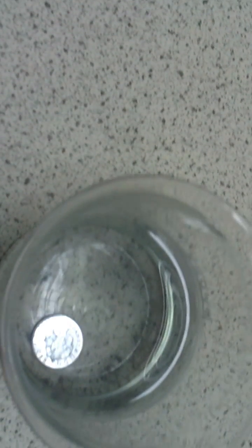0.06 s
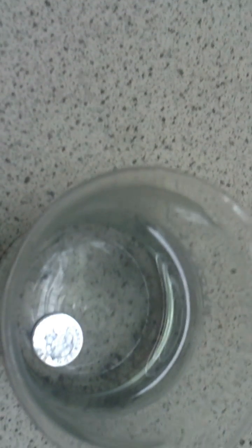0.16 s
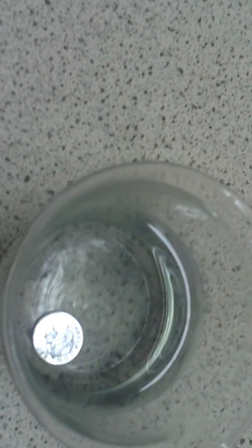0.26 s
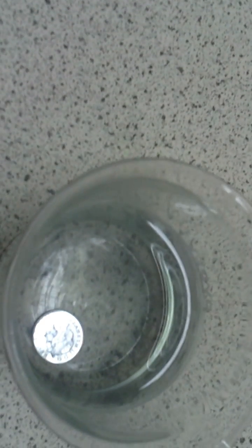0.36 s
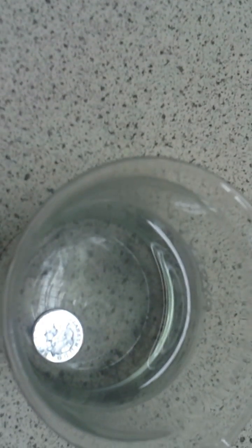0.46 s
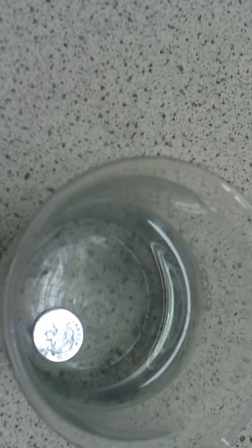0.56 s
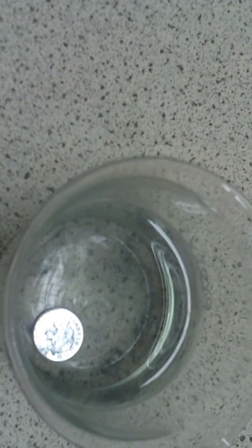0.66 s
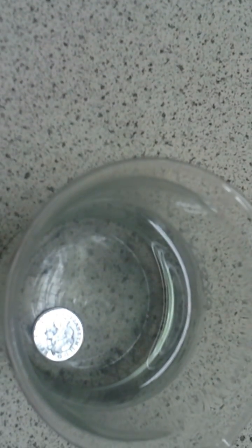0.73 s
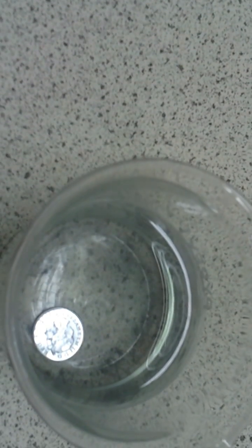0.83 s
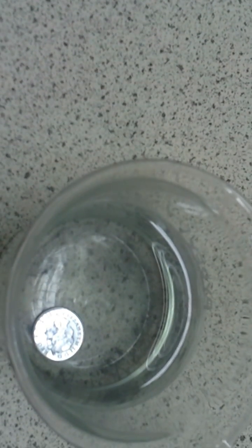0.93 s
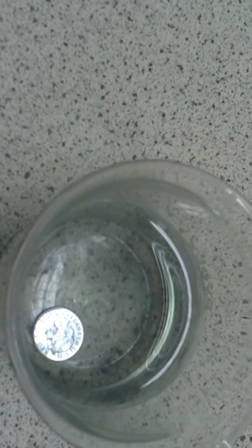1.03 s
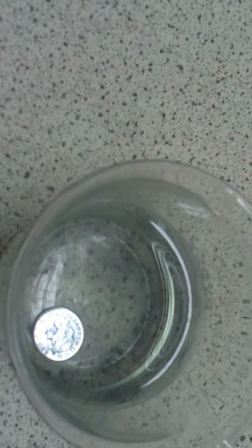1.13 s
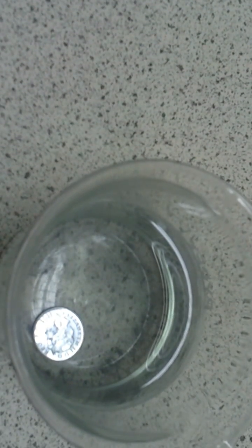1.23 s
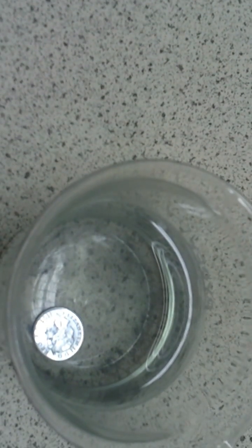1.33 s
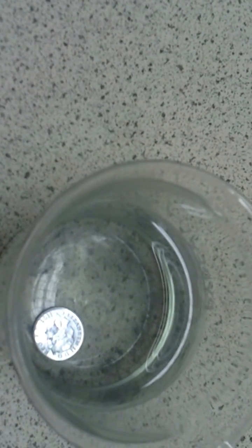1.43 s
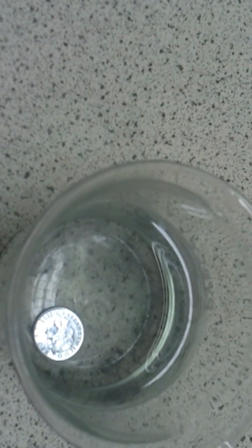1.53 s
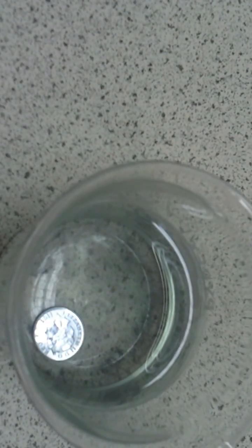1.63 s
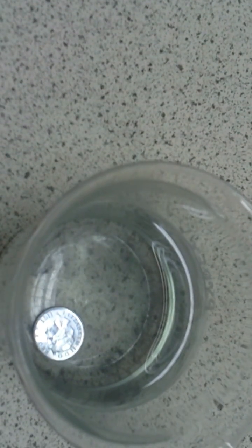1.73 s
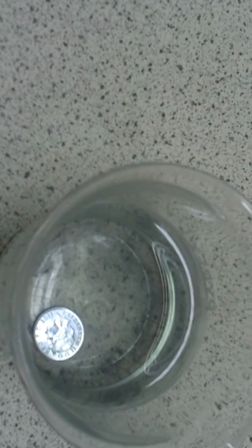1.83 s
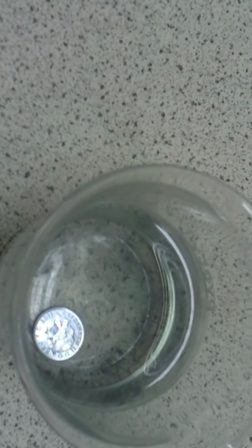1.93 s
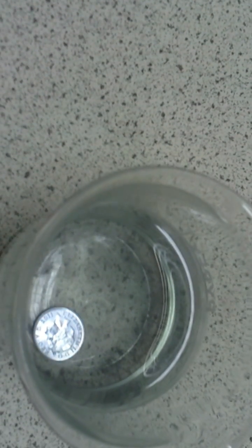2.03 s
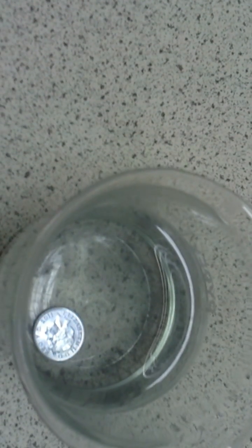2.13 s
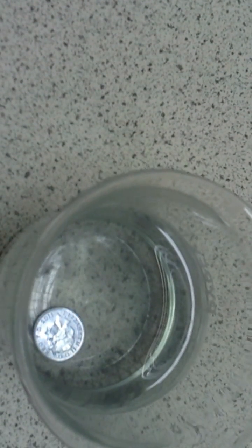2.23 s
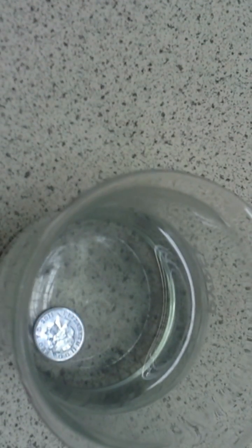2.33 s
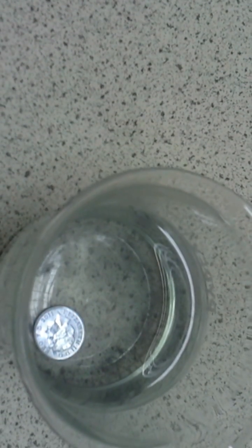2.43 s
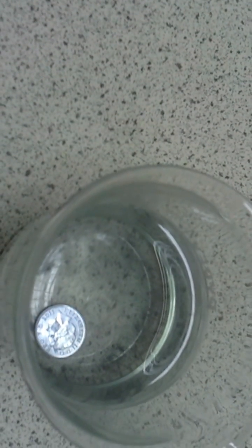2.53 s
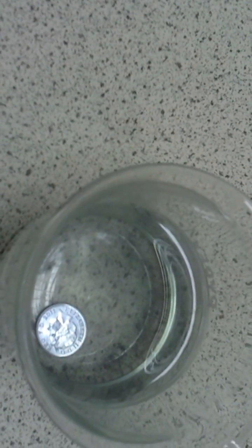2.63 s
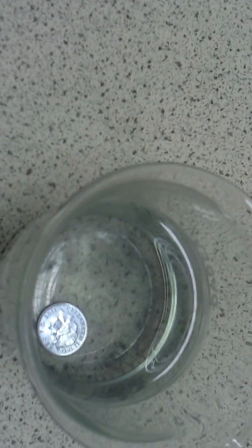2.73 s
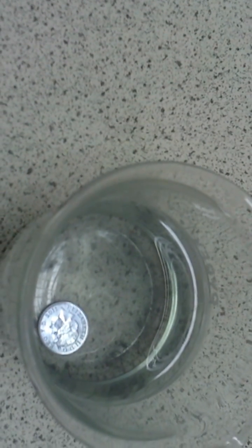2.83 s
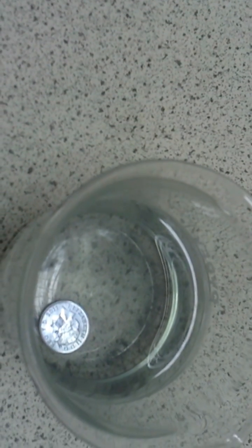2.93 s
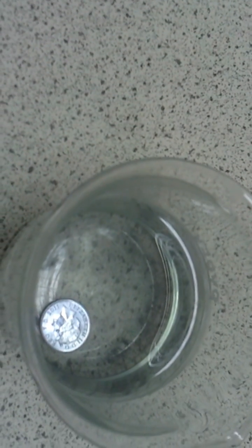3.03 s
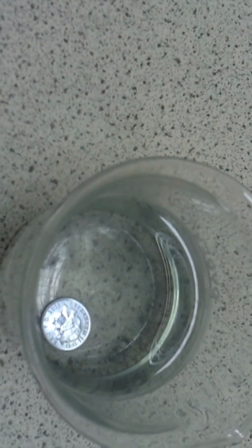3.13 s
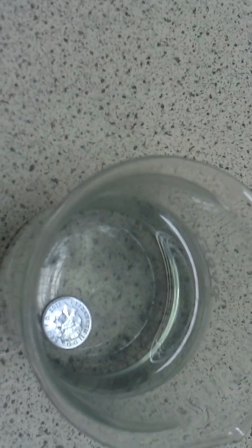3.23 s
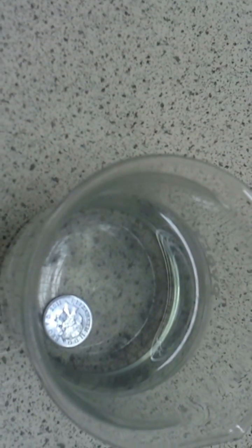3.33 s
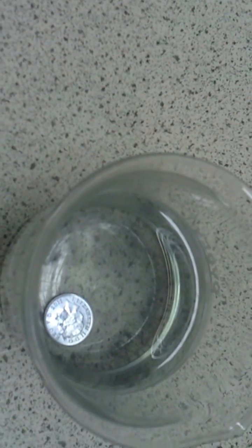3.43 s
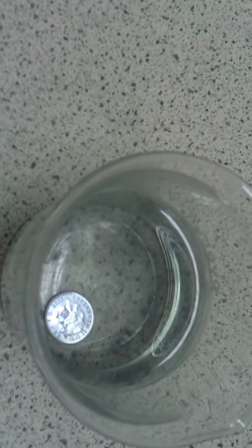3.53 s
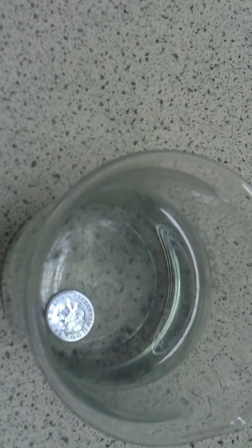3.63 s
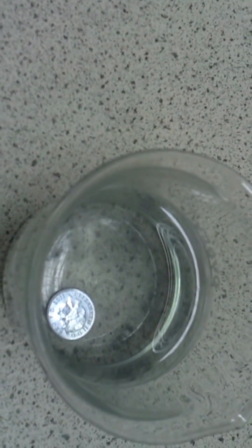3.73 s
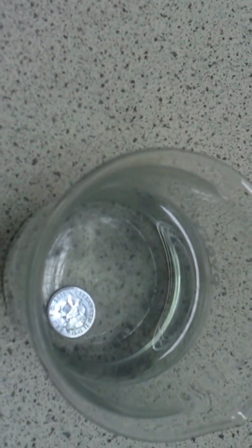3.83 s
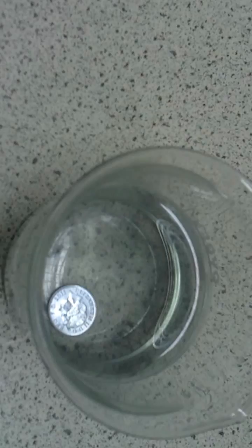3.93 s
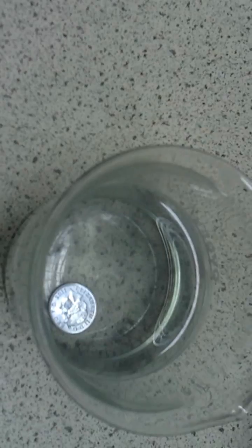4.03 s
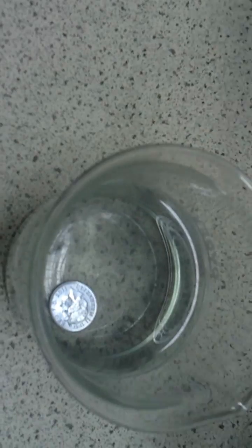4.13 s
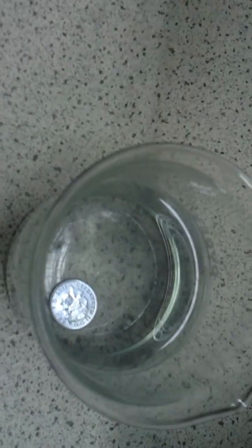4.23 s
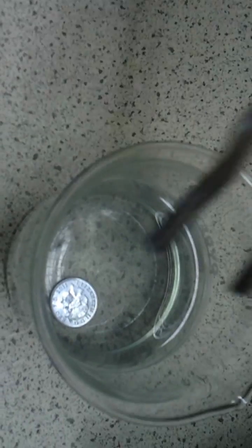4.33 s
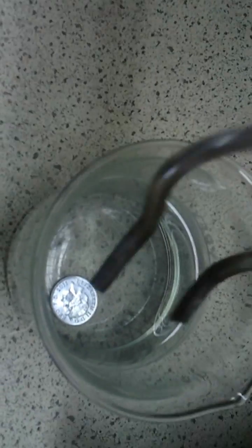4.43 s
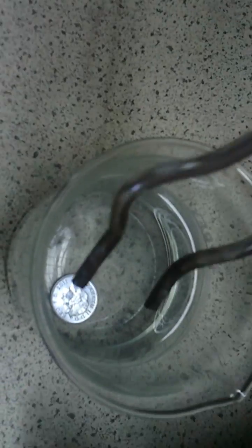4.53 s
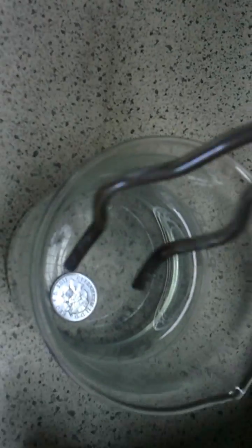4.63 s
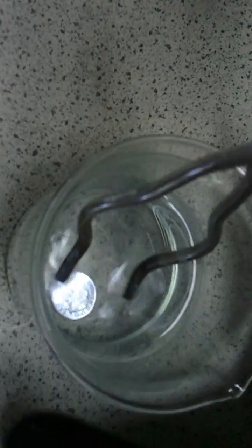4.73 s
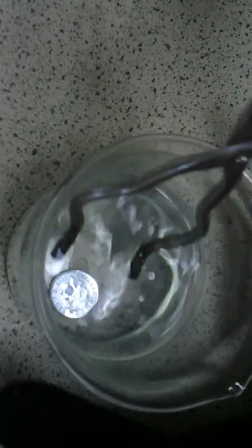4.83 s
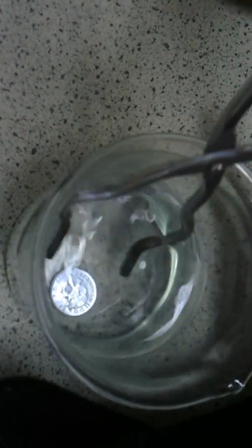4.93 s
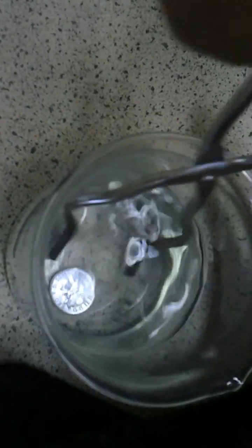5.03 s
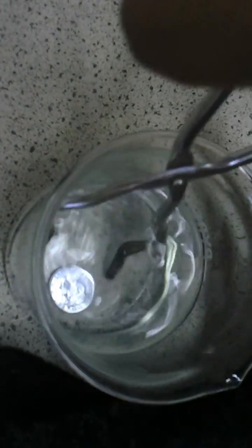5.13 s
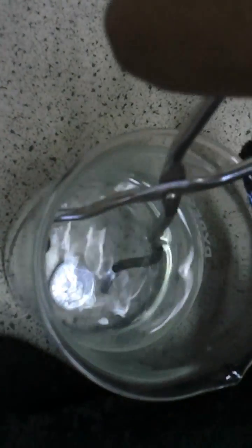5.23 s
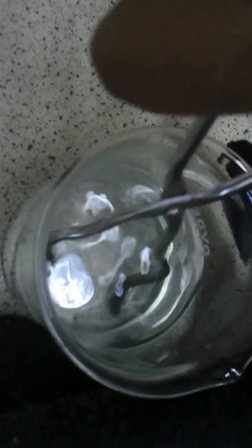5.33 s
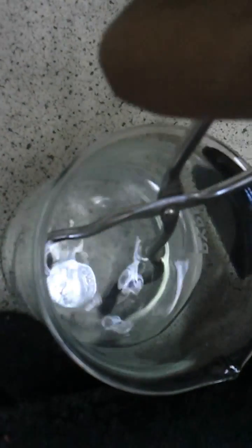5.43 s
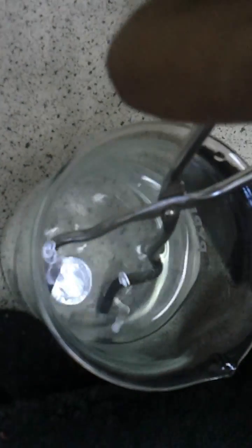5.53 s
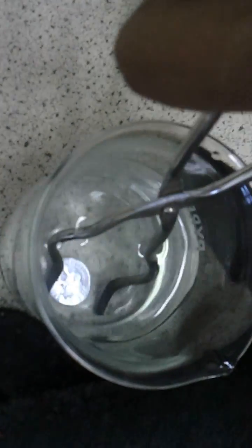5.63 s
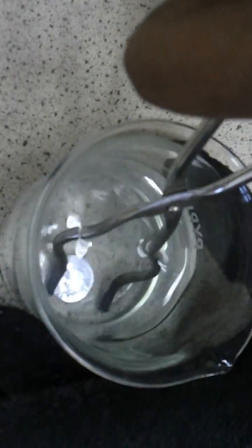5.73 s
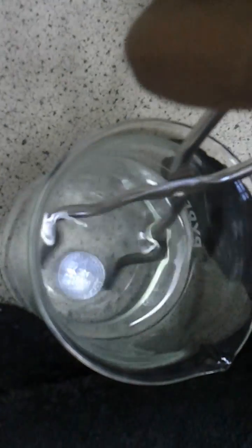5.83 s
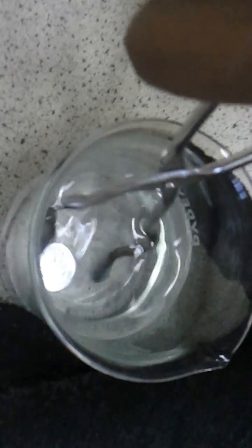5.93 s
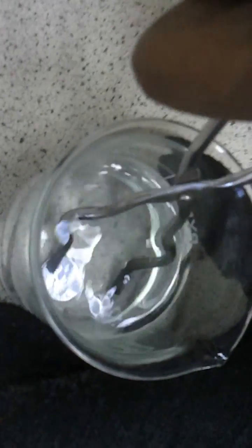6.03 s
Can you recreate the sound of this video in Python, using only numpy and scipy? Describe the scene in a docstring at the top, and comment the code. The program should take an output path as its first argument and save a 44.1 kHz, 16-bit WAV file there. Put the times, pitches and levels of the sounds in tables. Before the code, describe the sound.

A steady soft hiss with a thin high whine runs throughout, in a small hard room, heard close up. At 0.1 s a brisk sleeve swish. From 0.4 to 1.9 s something is shoved over the bench in short scrapes with low rumble, light taps and faint squeaks, strongest near 1.2 and 1.45 s. At 2.17 s one very loud, hard knock lands with a woody thump, a quick clatter and slight metallic rattle; two faint taps follow at 2.4 s. Then mostly quiet, with a weak squeak at 2.7 s and soft cloth swishes at 3.2, 3.9 and 4.2 s. Fingers rub at 4.9 s as steel tongs clink on the glass beaker, ringing brightly at 4.96 s and again, sharply, at 5.15-5.22 s. The glass rings on with a shimmer while its base grinds on the bench. A clink at 5.45 s, then small dull ticks until just after 6 s.

```python
"""Steel tongs clink on a glass beaker: wall modes ring, some in beating pairs, and the base knocks on the bench.
Before that a sleeve swishes (catch-and-slip noise) and things are shoved and knocked down on the bench top
(scrape and rumble noise, struck modes, noise bursts). Fingers rub the handles; faint squeaks are narrow noise.
A small hard room answers the impacts (convolved noise tail), over a steady hiss with a thin high whine."""
import sys
import numpy as np
from scipy import signal
from scipy.fft import rfft, irfft, next_fast_len
from scipy.io import wavfile
from scipy.ndimage import map_coordinates

SR = 44100
rng = np.random.default_rng(int(sys.argv[2]) if len(sys.argv) > 2 else 0)


def waveform_to_disk(signal):
    """Save audio, clipped to [-1, 1], as 16-bit WAV at the path in sys.argv[1]."""
    frames = np.transpose(np.atleast_2d(signal))
    scaled = np.clip(frames, -1, 1) * 32767
    samples = np.round(scaled).astype(np.int16)
    wavfile.write(sys.argv[1], SR, samples)


N = 267687


def amp(db):
    """Decibels to gain."""
    return 10 ** (np.asarray(db) / 20)


def unit(x):
    """x at rms 1."""
    return x / np.sqrt(np.mean(x ** 2) + 1e-20)


def along(points, hz):
    """[f/Hz, value] points interpolated on a log frequency axis."""
    f, v = np.transpose(points)
    return np.interp(np.log(hz + 1), np.log(f), v)


def filtered(x, response):
    """x times a response of frequency."""
    m = next_fast_len(len(x) + SR // 4)
    spectrum = rfft(x, m) * response(np.fft.rfftfreq(m, 1 / SR))
    return irfft(spectrum, m)[:len(x)]


def coloured(x, spectrum):
    """x shaped by a [f/Hz, level/dB] spectrum, at rms 1."""
    return unit(filtered(x, lambda hz: amp(along(spectrum, hz))))


def resonant(x, peaks):
    """x through parallel [f/Hz, width/Hz, level/dB] resonances of alternating sign, at rms 1."""
    def response(f):
        total = 0
        for k, (centre, width, db) in enumerate(peaks):
            loss = 1j * f * width
            total = total + (-1) ** k * amp(db) * loss / (centre ** 2 - f ** 2 + loss)
        return total
    return unit(filtered(x, response))


def no_bass(x, edge_hz):
    """High-pass: a body radiates little below its lowest mode."""
    return signal.sosfilt(signal.butter(4, edge_hz, "highpass", fs=SR, output="sos"), x)


def friction(grain_db, rate_hz):
    """Noise whose level wanders between random values, rate_hz a second, as surfaces catch and slip."""
    points = rng.standard_normal(int(N * rate_hz / SR) + 4)
    catches = map_coordinates(points, [np.arange(N) * rate_hz / SR], order=1)
    return rng.standard_normal(N) * amp(grain_db * catches)


STROKE_SHAPE = 1.5  # exponent: 1 is pointed, 2 a round bell


def stroke(s, rise_s, fall_s):
    """Speed of one hand movement, peaking at 1 at s seconds."""
    t = np.arange(N) / SR - s
    scaled = np.abs(t / np.where(t < 0, rise_s, fall_s))
    return np.exp(-np.minimum(scaled, 20) ** STROKE_SHAPE)


def ring(modes, t, scatter_db, attack_s):
    """One blow on [f/Hz, level/dB, t60/s] modes; each contact point weights them anew."""
    hz, db, t60 = np.transpose(modes)[:, :, None]
    gain = amp(db + scatter_db * rng.standard_normal(hz.shape))
    sign = rng.choice([-1, 1], hz.shape)
    waves = sign * gain * amp(-60 * t / t60) * np.sin(2 * np.pi * hz * t)
    return waves.sum(axis=0) / np.linalg.norm(gain) * (1 - np.exp(-t / attack_s))


def burst(spectrum, t, t60_s):
    """Hard contact: coloured noise dying exponentially."""
    return coloured(rng.standard_normal(len(t)), spectrum) * amp(-60 * t / t60_s)


def add(track, s, sound):
    """Mix a sound into the track at s seconds."""
    part = track[round(s * SR):][:len(sound)]
    part += sound[:len(part)]


# room and microphone noise: [f/Hz, level/dB]
AIR = [(15, -53), (25, -49.5), (64, 0), (99, -5), (128, 0), (223, -2), (370, 0.5), (494, -2.5), (676, -2),
       (744, -4.5), (1070, -5.5), (2200, -3), (5230, -13.5), (6340, -8), (7870, -51.5), (10200, -58.5),
       (17300, -120)]
# humps in the hiss: [f/Hz, width/Hz, level/dB]
WHINE = [(4700, 200, -9), (6246, 210, -2)]


def hiss():
    """Steady room and microphone noise plus a thin high whine of narrow-band noise."""
    air = amp(-51.5) * coloured(rng.standard_normal(N), AIR)
    return air + amp(-56.5) * resonant(rng.standard_normal(N), WHINE)


# room decay: [f/Hz, t60/s]
ROOM = [(150, 0.5), (800, 0.38), (3000, 0.23), (8000, 0.45)]


def room(x):
    """Room tail: noise in which each frequency dies at its own speed."""
    hz, t, z = signal.stft(rng.standard_normal(SR // 2), SR, nperseg=256)
    tail = signal.istft(z * amp(-60 * t / along(ROOM, hz)[:, None]), SR)[1]
    tail *= 1 - np.exp(-np.arange(len(tail)) / SR / 0.0054)  # build-up time constant, s
    return signal.fftconvolve(x, tail / np.linalg.norm(tail))[:N]


# surfaces that stick as they slide: [t/s, length/s, f/Hz, width/Hz, level/dB]
SQUEAKS = [(.36, .09, 1700, 80, -58), (.635, .06, 6600, 120, -53), (.66, .2, 3085, 60, -54),
           (2.7, .28, 2080, 280, -51), (3.46, .09, 1900, 250, -53)]


def squeaks():
    """Each squeak is a narrow, unsteady tone (band of noise) that swells and fades."""
    out = np.zeros(N)
    for s, length_s, f_hz, width_hz, db in SQUEAKS:
        swell = np.hanning(round(length_s * SR))
        tone = filtered(rng.standard_normal(SR // 2), lambda f: np.exp(-((f - f_hz) / width_hz) ** 2))
        add(out, s, amp(db) * swell * unit(tone[:len(swell)]))
    return out


# cloth noise, brisk and slow: [f/Hz, level/dB]
BRISK_CLOTH = [(88, -58), (150, -35), (223, -32), (247, -29), (361, -15.5), (503, -19), (645, -2),
               (800, -14), (992, -5), (1190, -9), (2390, 1), (6040, -14), (7870, -31.5), (10200, -62),
               (17300, -120)]
SLOW_CLOTH = [(88, -43), (150, -21), (209, -13.5), (296, -16), (361, -4.5), (666, -4.5), (1210, -7),
              (2430, -1), (4060, -11), (6240, -15.5), (7870, -33), (10200, -60), (17300, -120)]
# sleeve swishes: [t/s of peak speed, rise/s, fall/s, level/dB, briskness 0-1]
SWISHES = [(.095, 0.052, 0.15, -33, 1), (.42, 0.036, 0.23, -51.5, 1), (3.22, 0.086, 0.17, -43, 0.03),
           (3.52, 0.069, 0.14, -54, .02), (3.92, 0.11, 0.069, -49, 0), (4.21, 0.11, 0.13, -37, 0.13)]


def sleeve():
    """Cloth friction follows arm speed; brisk strokes sound thinner."""
    brisk = coloured(friction(grain_db=0.5, rate_hz=230), BRISK_CLOTH)
    slow = coloured(friction(grain_db=0.5, rate_hz=230), SLOW_CLOTH)
    out = np.zeros(N)
    for s, rise_s, fall_s, db, briskness in SWISHES:
        cloth = np.sqrt(briskness) * brisk + np.sqrt(1 - briskness) * slow
        out += amp(db) * stroke(s, rise_s, fall_s) * cloth
    return out


# one rub of the handles: [t/s of peak speed, rise/s, fall/s, level/dB]
GRIP = (4.93, .036, .07, -32.5)
# skin on handles: [f/Hz, level/dB]
RUB = [(59, -46), (100, -29), (223, -4.5), (310, -19), (408, -1.5), (644, -10), (788, -9), (963, -13.5),
       (1860, -8), (5660, -22.5), (7870, -42), (10200, -73), (17300, -120)]


def fingers():
    """Fingers rub on the handles: friction noise following their speed."""
    s, rise_s, fall_s, db = GRIP
    return amp(db) * stroke(s, rise_s, fall_s) * coloured(friction(grain_db=3.5, rate_hz=550), RUB)


# shoves over the bench: [t/s of peak speed, rise/s, fall/s, scrape level/dB, rumble drive level/dB]
SHOVES = [(.57, 0.03, 0.06, -55, -52), (0.702, 0.0085, .016, -45, -48), (.785, 0.03, .025, -48.5, -49),
          (0.839, 0.016, 0.02, -47, -45), (1.174, .02, 0.012, -35.5, -36.5),
          (1.21, 0.012, 0.02, -49, -43.5), (1.4425, 0.042, 0.032, -32, -31),
          (1.49, 0.013, 0.021, -38.5, -39), (1.608, 0.031, 0.024, -44, -45),
          (1.70, .035, 0.016, -48, -47.5), (1.924, 0.021, 0.017, -62, -46.5)]
# bench top rumble: [f/Hz, level/dB]
RUMBLE = [(35, -51), (65, -43), (105, 0.5), (140, 4), (207, -1), (338, -21), (450, -15), (580, -54),
          (990, -120)]
# resonances of the scrape: [f/Hz, width/Hz, level/dB]
SCRAPE = [(652, 27, 8.5), (970, 30, -9), (1690, 89, -2.5), (2190, 150, 1), (2580, 120, 1.5),
          (3100, 150, -11)]
# broad scuffing noise: [f/Hz, level/dB]
SCUFF = [(180, -47), (300, -12), (511, -25), (619, 4), (825, -36), (946, -5), (1210, -14), (2600, -9.5),
         (5290, -22.5), (7870, -34), (10200, -67), (17300, -120)]
RUMBLE_LAG_S = 0.019  # slab build-up and decay time constant


def shoves():
    """A dragged thing scrapes with its speed; the slab's rumble lags through a one-pole smoother."""
    scrape, drive = np.zeros(N), np.zeros(N)
    for s, rise_s, fall_s, scrape_db, rumble_db in SHOVES:
        speed = stroke(s, rise_s, fall_s)
        scrape += amp(scrape_db) * speed
        drive += amp(rumble_db) * speed
    keep = np.exp(-1 / (RUMBLE_LAG_S * SR))
    lagged = signal.lfilter([1 - keep], [1, -keep], drive)
    rumble = lagged * coloured(friction(grain_db=4, rate_hz=75), RUMBLE)
    body = amp(-3.5) * resonant(friction(grain_db=4.5, rate_hz=350), SCRAPE)
    scuff = amp(-4) * coloured(friction(grain_db=5.5, rate_hz=360), SCUFF)
    return rumble + scrape * (body + scuff)


# beaker pushed along the bench: [t/s of peak speed, rise/s, fall/s, level/dB]
NUDGES = [(5.26, .012, 0.037, -36), (5.42, 0.052, 0.049, -36.5), (5.52, .04, 0.13, -51),
          (6.03, 0.17, .1, -51.5)]
# glass base on bench: [f/Hz, level/dB]
GRIND = [(88, -57), (150, -22.5), (578, -6), (920, -18.5), (1020, 2), (1180, -4.5), (1300, -12),
         (2250, -16), (2600, -39), (3380, -68), (5720, -120)]


def nudges():
    """The beaker grinds along the bench: friction noise following its speed."""
    speed = sum(amp(db) * stroke(s, rise_s, fall_s) for s, rise_s, fall_s, db in NUDGES)
    return speed * coloured(friction(grain_db=3.5, rate_hz=230), GRIND)


# knocks and ticks on the bench: [t/s, level/dB, bright tick re crack/dB]
KNOCKS = [(0.631, -37.5, -3), (0.696, -37, 0.5), (0.873, -35, 1.5), (1.121, -41, -16), (1.385, -34.5, -10),
          (1.458, -29, -6), (2.126, -34, -4), (2.1651, -2.5, -17), (2.170, -21.5, 4), (2.176, -20.5, -8),
          (2.195, -21, -12), (2.206, -28, -32), (2.382, -40, -18), (2.402, -37.5, -18)]
# modes of the thing set down: [f/Hz, level/dB, t60/s]
STRIKER = [(492, -11, 0.032), (752, -4, 0.026), (870, -13.5, .04), (1130, -7, 0.033), (1290, -6.5, 0.027),
           (1810, 2.5, 0.017), (2130, 4.5, 0.0085), (2450, -3, 0.015)]
# modes of the bench slab: [f/Hz, level/dB, t60/s]
BENCH = [(105.4, -8, 0.25), (131.7, -2.5, 0.22), (173.5, -3, 0.096), (222, -8.5, .16), (275.4, -6.5, 0.19),
         (365, 0, 0.075)]
# bright tick noise: [f/Hz, level/dB]
TICK = [(2500, -2), (4500, -9.5), (5750, 4), (6600, -13.5), (8000, -30)]
# noise of a hard thing on the bench, also of the beaker's base: [f/Hz, level/dB]
SLAP = [(150, -7.5), (400, -2), (800, 0.5), (1400, -9), (2200, 5), (3300, 0.5), (4000, -34), (8000, -35.5)]
CATCH_DB, CATCH_TICK_DB = -1.5, -9  # one catch per shove: re its scrape; tick re crack
THUMP_DB, THUMP_GROWS = -14, .09  # thump re crack at 0 dB; dB less per dB of lighter knock


def bench():
    """Things land or catch on the bench: dry crack, bright tick, and the slab's push and ringing."""
    out, t = np.zeros(N), np.arange(SR // 2) / SR
    push = amp(10.5) * np.sin(2 * np.pi * 150 * t) * amp(-60 * t / 0.047) * (1 - np.exp(-t / 0.01))
    thump = push + amp(-0.5) * ring(BENCH, t, scatter_db=-1.0, attack_s=0.0029)
    catches = [(s, scrape_db + CATCH_DB, CATCH_TICK_DB) for s, _, _, scrape_db, _ in SHOVES]
    for s, db, tick_db in KNOCKS + catches:
        crack = ring(STRIKER, t, scatter_db=0, attack_s=0.0001) + amp(-10.5) * burst(SLAP, t, t60_s=0.027)
        slab = amp(THUMP_DB + THUMP_GROWS * db) * thump
        tick = amp(tick_db) * burst(TICK, t, t60_s=0.013)
        add(out, s, amp(db) * (crack + slab + tick))
    return no_bass(out, edge_hz=80)


# jaws rattling after the heavy knock: [t/s, level/dB]
RATTLES = [(2.175, -31), (2.206, -29)]
# modes of the jaws' click: [f/Hz, level/dB, t60/s]
CLICK = [(2960, -3, 0.046), (3268, -2, 0.052), (3355, 2, 0.039), (3510, -4.5, 0.05)]


def rattles():
    """The tongs' jaws rattle: their click modes struck with widely scattered weights."""
    out, t = np.zeros(N), np.arange(SR // 2) / SR
    for s, db in RATTLES:
        add(out, s, amp(db) * ring(CLICK, t, scatter_db=4, attack_s=.001))
    return no_bass(out, edge_hz=80)


# jaws on the glass: [t/s, base knock level/dB, arms clack level/dB, jaws click level/dB,
# wall ring level/dB, contact hardness/dB, extra damping/(dB/s) by the resting jaw (negative: slower decay)]
CLINKS = [(4.957, -19.5, -14.5, -31, -16, -1, 0), (4.960, -15, -21.5, -34, -8.5, -1.5, 248.5),
          (4.975, -20, -16, -13.5, -14, 7, -3.5), (5.144, -22.5, -16, -10.5, -16.5, -7.5, -1.5),
          (5.149, -15, -15.5, -17, -1.5, -1.5, 430), (5.169, -55, -45, -53, -21.5, 5, 21),
          (5.201, -23, -18.5, -16.5, -14.5, 6, 91), (5.2246, -9.5, -15.5, -10.5, -19.5, 0.5, 4.5),
          (5.449, -13.5, -24.5, -12.5, -34.5, 9, 28), (5.617, -41.5, -33.5, -25.5, -53, 9, 50),
          (5.705, -29.5, -42.5, -65, -66, -6, 40), (5.807, -40, -37, -34, -46, -10, 40),
          (5.824, -27, -36.5, -36, -54, -10, 42), (5.862, -25.5, -32.5, -36, -35, -10.5, 300),
          (5.937, -57, -36, -23.5, -34.5, 12, 30), (5.994, -20, -34, -50, -43, -0.5, -1),
          (6.003, -21.5, -33.5, -30.5, -39, -3, -3), (6.058, -26.5, -30.5, -25.5, -32, -7, 27)]
# wall bending modes in three registers, close pairs split by the spout: [f/Hz, level/dB, t60/s]
WALL_LOW = [(1139, -19, .8), (2832, 0, .75), (2927, -3, .5)]
WALL_MIDDLE = [(4734, -5.5, .36), (5029, 0, .21), (5065, -4, .24)]
WALL_TOP = [(7000, 0, .16), (7111, -11, .2), (7333, -6, .15)]
# base knocking on the bench, then rocking on its edge: [f/Hz, level/dB, t60/s]
BASE = [(273, -24.5, 0.079), (403.5, -15, 0.13), (610.3, 3, 0.061), (663, -3, 0.08)]
ROCKING = [(694, -1.5, 0.043), (816.4, -1.5, 0.096), (1044, -5.5, 0.076), (1365, -8.5, 0.07)]
# tongs' steel arms, then thin jaw tips: [f/Hz, level/dB, t60/s]
STEEL = [(1287, 0, 0.052), (1457, -1.5, 0.037), (1780, -16, .04), (2005, -11, 0.03), (2227, -6, 0.054),
         (2470, -0.5, 0.02)]
TIP = [(3200, -12.5, .09), (4090, -18.5, 0.11), (4860, -7, .08), (5355, -3, 0.12), (5450, 2, 0.065),
       (6040, -7, .04), (8030, -25, 0.07)]
# steel-on-glass contact noise: [f/Hz, level/dB]
CRACK = [(100, -24), (250, -4), (800, 4), (2800, 0.5), (3400, -8.5), (4100, -19), (5600, -2.5), (8000, -27)]
# harder contact favours higher parts: (offset/dB, slope/(dB per dB of hardness))
# rocking re flat knock; tips re mean of jaws and wall; middle and top wall registers re lowest
ROCK_LAW = (-6.5, 1.07)
TIP_LAW = (-6.5, 0.94)
MIDDLE_LAW = (-9, 0.99)
TOP_LAW = (-15, .9)


def beaker():
    """Each contact checks the wall's old ringing, starts a new one and jolts base and tongs."""
    wall, jolts, t = np.zeros(N), np.zeros(N), np.arange(SR) / SR
    brief = t[:SR // 3]
    next_contact = [row[0] for row in CLINKS[1:]] + [N / SR]
    laws = ROCK_LAW, TIP_LAW, MIDDLE_LAW, TOP_LAW
    for clink, until in zip(CLINKS, next_contact):
        s, base_db, arms_db, jaws_db, wall_db, hardness_db, damping_db_s = clink
        rock, tips, middle, top = (offset + slope * hardness_db for offset, slope in laws)

        registers = (0, WALL_LOW), (middle, WALL_MIDDLE), (top, WALL_TOP)
        glass = sum(amp(wall_db + db) * ring(modes, t, scatter_db=1, attack_s=.0006)
                    for db, modes in registers)
        checked = np.exp(-np.maximum(t - (until - s), 0) / .0015)
        add(wall, s, glass * amp(-damping_db_s * t) * checked)

        parts = ((base_db, BASE), (base_db + rock, ROCKING), (arms_db, STEEL), (jaws_db, CLICK),
                 ((jaws_db + wall_db) / 2 + tips, TIP))
        add(jolts, s, sum(amp(db) * ring(modes, brief, scatter_db=1.8, attack_s=.0002)
                          for db, modes in parts))
        slap = amp(base_db - 24.5) * burst(SLAP, brief, t60_s=0.021)
        crack = amp(arms_db - 4.0) * burst(CRACK, brief, t60_s=0.086)
        add(jolts, s, slap + crack)
    return no_bass(wall, edge_hz=130), no_bass(jolts, edge_hz=155)


# share of bench knocks and rattles sent to the room: [f/Hz, level/dB]
SLAB_SPREAD = [(200, -9.5), (600, -8.5), (1300, -9.5), (2200, -15.5), (3400, -12), (5500, -18.5)]


def scene():
    """All sources; the impacts also feed the room."""
    wall, jolts = beaker()
    knocks = bench() + rattles()
    spread = filtered(knocks, lambda hz: amp(along(SLAB_SPREAD, hz)))
    wet = room(amp(-24) * wall + amp(-17.5) * jolts + spread)
    moving = shoves() + nudges() + squeaks() + sleeve() + fingers()
    return (wall + jolts + knocks + wet + moving + hiss())[None]


TOP_HZ = 8020  # band limit


def record(dry):
    """The recorder rounds off peaks near full scale and keeps nothing above its band limit."""
    clipped = dry[0] / (1 + (dry[0] / .92) ** 8) ** (1 / 8)
    # 100 Hz wide slope centred on TOP_HZ
    return filtered(clipped, lambda hz: np.clip((TOP_HZ - hz) / 100 + .5, 0, 1))[None]


dry = scene()
out = record(dry)
waveform_to_disk(out)
```